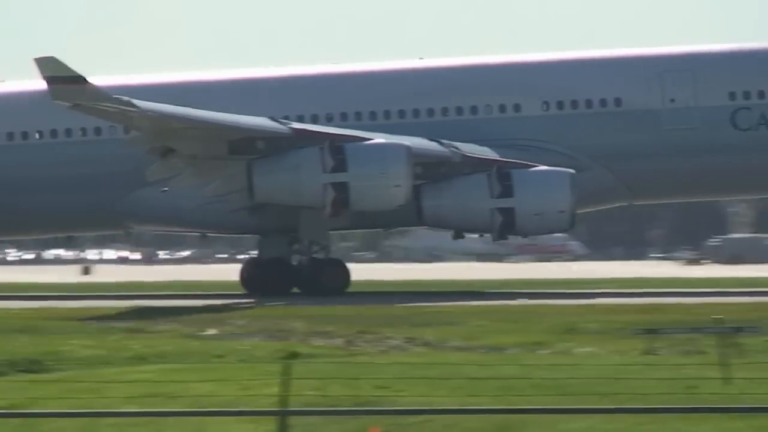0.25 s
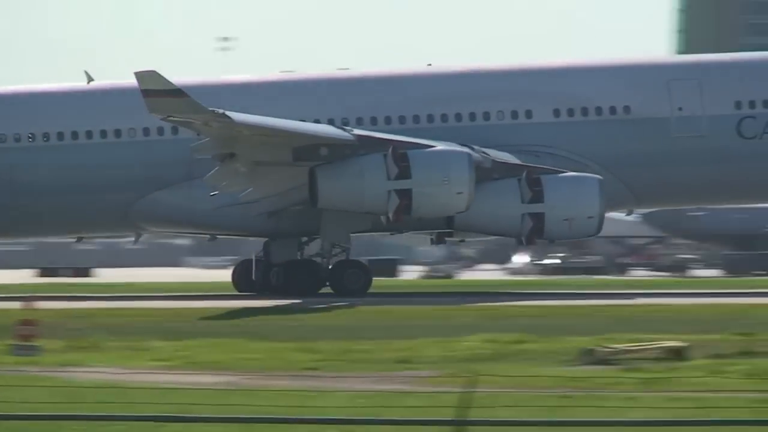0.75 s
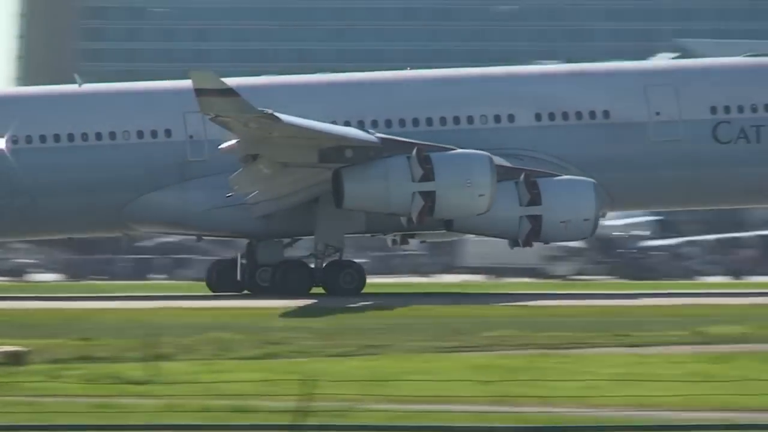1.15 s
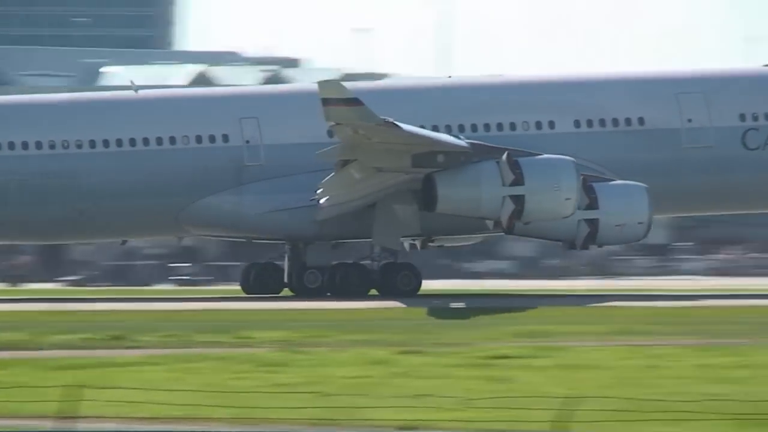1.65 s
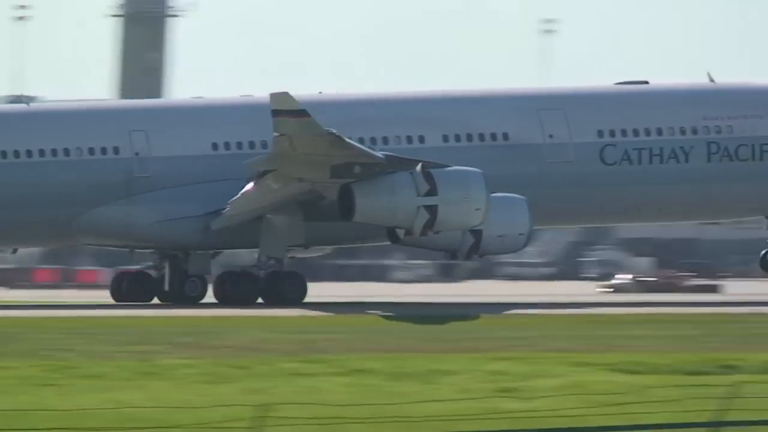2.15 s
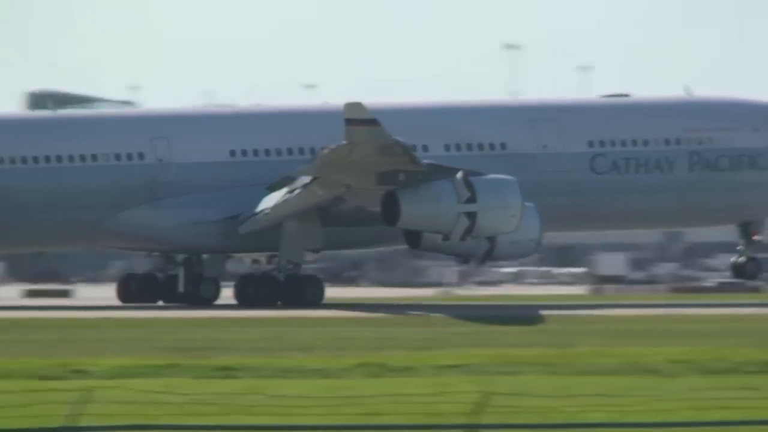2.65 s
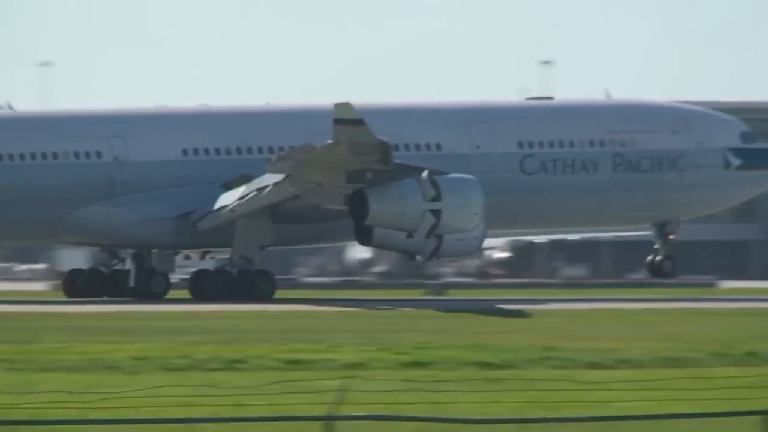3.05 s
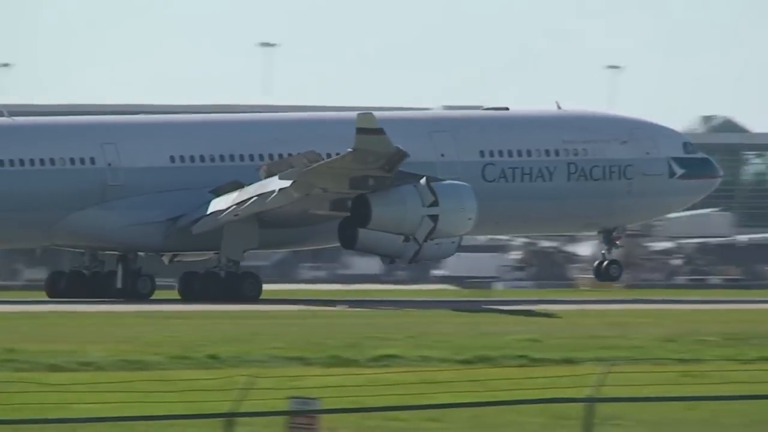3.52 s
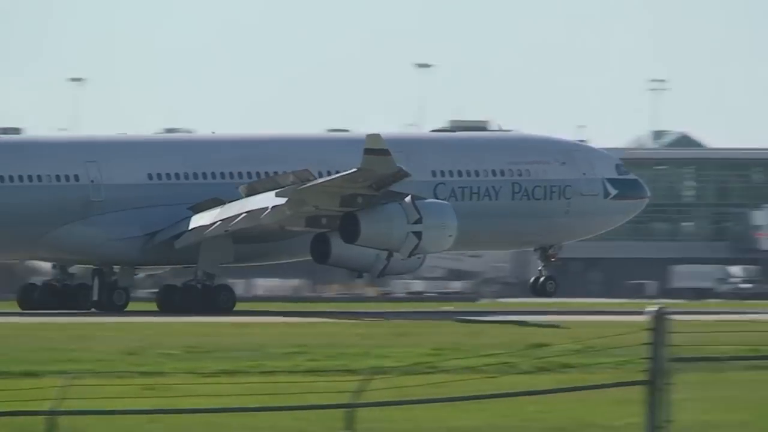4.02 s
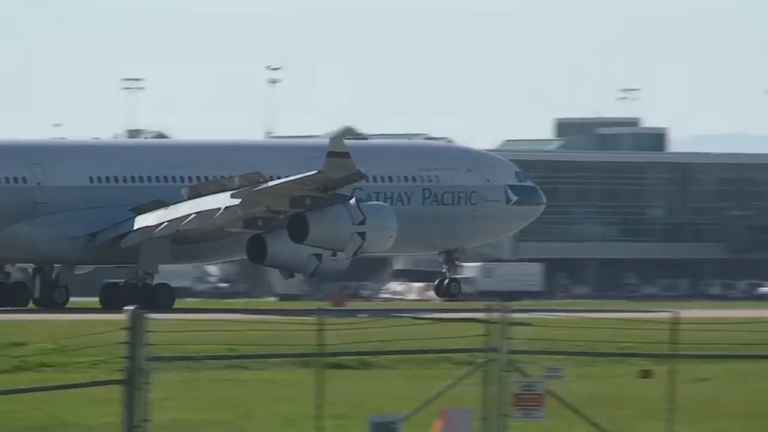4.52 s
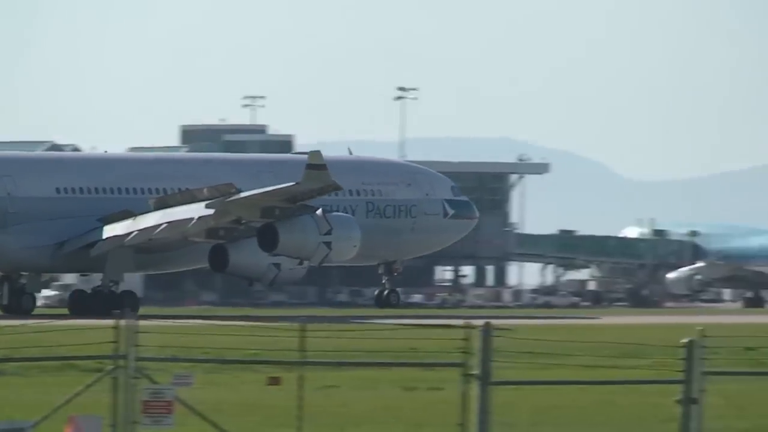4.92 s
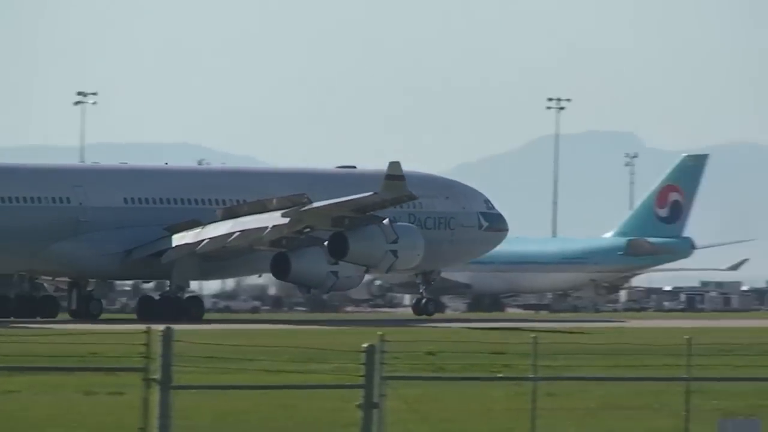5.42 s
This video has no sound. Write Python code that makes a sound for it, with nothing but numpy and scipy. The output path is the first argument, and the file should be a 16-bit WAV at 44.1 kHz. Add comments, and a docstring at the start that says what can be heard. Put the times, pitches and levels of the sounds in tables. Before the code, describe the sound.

Across an open airfield, the churning roar of a passing airliner's reversed jets runs throughout, rising and falling in uneven waves. It surges early, drops back briefly, then grows loud again and eases a little near the end, its pitch slowly sliding down. Beneath it are a soft exhaust rumble and light wind on the microphone, which ticks faintly on some peaks.

```python
"""A jet roar swells and fades: a four-engine airliner rolls past, heard across a field.
It is braking on the runway with reverse thrust, and its deflected jets churn the air.
Their tone sinks as the aircraft passes, and wind over the grass makes the loudness come and go.
Underneath lie a low exhaust rumble and a light breeze. The small microphone adds faint ticks."""
import sys
import numpy as np
from scipy import signal
from scipy.fft import rfft, irfft
from scipy.io import wavfile
from scipy.ndimage import uniform_filter1d, minimum_filter1d

SR = 44100
rng = np.random.default_rng(int(sys.argv[2]) if len(sys.argv) > 2 else 0)


def waveform_to_disk(signal):
    """Save audio, clipped to [-1, 1], as 16-bit WAV at the path in sys.argv[1]."""
    frames = np.transpose(np.atleast_2d(signal))
    scaled = np.clip(frames, -1, 1) * 32767
    samples = np.round(scaled).astype(np.int16)
    wavfile.write(sys.argv[1], SR, samples)


N = 250443
FRAME_HZ = np.fft.rfftfreq(1024, 1 / SR)  # the pitches in one short slice (frame) of sound
CLOSEST_S, SPEED_M_PER_S, DISTANCE_M = 1.95, 63.3, 248  # when, how fast and how far off it passes


def gain_of(db):
    """Turns decibels into a number to multiply the sound by."""
    return 10 ** (np.asarray(db) / 20)


def evened(x):
    """Scales a signal to an average strength (rms) of 1."""
    return x / np.sqrt(np.mean(x ** 2) + 1e-20)


def spectrum_db(points, hz):
    """The level at each pitch, joining a table's points with straight lines over the octaves."""
    pitch_hz, level_db = np.transpose(points)
    return np.interp(np.log(hz + 1), np.log(pitch_hz + 1), level_db)


def follow(rows, t):
    """The value of each table column at the times t."""
    time_s, *columns = np.transpose(rows)
    return [np.interp(t, time_s, column) for column in columns]


def bell(x, centre, width):
    """A smooth hump of height 1."""
    return np.exp(-.5 * ((x - centre) / width) ** 2)


def ramp(hz, zero_hz, full_hz):
    """Goes from 0 at one pitch to 1 at another."""
    return np.clip(np.log((hz + 1) / zero_hz) / np.log(full_hz / zero_hz), 0, 1)


def to_frames(x, size=1024):
    """Cuts a sound into short frames; returns their times and their spectra."""
    _, t, spectra = signal.stft(x, SR, nperseg=size, noverlap=size - size // 4)
    return t[:, None], spectra.T


def to_sound(spectra, size=1024):
    """Joins the frames back into a sound."""
    return signal.istft(spectra.T, SR, nperseg=size, noverlap=size - size // 4)[1][:N]


# How the roar swells and fades on arrival. Columns: time_s, level_db
ROAR_LOUDNESS = [(0, -30.5), (.31, -23), (.58, -28), (.74, -19), (.91, -19), (1.21, -26), (1.53, -28.5),
                 (1.93, -22.5), (2.39, -18.5), (2.59, -21.5), (3.18, -20.5), (3.42, -22.5), (3.57, -21.5),
                 (3.75, -23), (4.04, -19), (4.42, -18.5), (4.75, -20), (5.07, -23.5), (5.44, -22.8),
                 (5.68, -25)]


def roar(level_db=-0.15, twinkle_db=0.5, flutter_db=0.52):
    """The reversed jets: churning air, coloured by the engines, their motion and the field."""
    t, spectra = to_frames(turbulence(shocks_per_s=600, shock_share=0.2))
    # swirls of air on the way make the sound twinkle in patches and flutter as a whole
    twinkle = twinkle_db * eddies(spectra.shape, size=(10, 16))
    flutter = flutter_db * eddies((len(t), 1), size=(9, 1))
    colour = gain_of(engine_db(t) + wind_db(t) + ground_db(t) + twinkle)
    colour /= np.sqrt(np.mean(colour ** 2, axis=1, keepdims=True))  # same power in every frame
    loud_db = follow(ROAR_LOUDNESS, t)[0] + flutter + level_db
    return to_sound(spectra * colour * gain_of(loud_db))


def turbulence(shocks_per_s, shock_share):
    """Exhaust mixing with the air: a rushing noise with weak shocks scattered through it."""
    shocks = rng.standard_normal(N) * (rng.random(N) < shocks_per_s / SR)
    return evened(rng.standard_normal(N) + shock_share * evened(shocks))


def eddies(shape, size):
    """Swirls of air as smooth random patches; size is (frames, pitch steps) across."""
    patches = rng.standard_normal(shape)
    for axis, length in enumerate(size):
        for _ in range(2):
            patches = uniform_filter1d(patches, length, axis, mode="wrap")
    return evened(patches)


def bearing(t):
    """Angle to the aircraft in radians: negative as it comes, zero when it is closest."""
    return np.arctan(SPEED_M_PER_S * (t - CLOSEST_S) / DISTANCE_M)


# The roar's overall tone, from bass to treble. Columns: pitch_hz, level_db
JET_SPECTRUM = [(60, -59.5), (200, -25), (330, -14.5), (550, -8.5), (850, -1), (1200, 4), (1900, -2),
                (3200, -3.5), (4200, -6), (5400, -15), (6800, -26.5), (8300, -41.5), (10000, -56.5),
                (13000, -67.5)]
# Bumps and dips in that tone, before motion shifts and scales them. Columns: pitch_hz, width_hz, gain_db
ENGINE_HUMPS = [(520, 70, 2.5), (1653, 130, -2), (1980, 170, 2), (2416, 108, -4.5), (2920, 220, 3),
                (4620, 150, -2.5), (5260, 270, 0.94)]
# Directions in which the engines beam extra sound.
# Columns: bearing_deg, spread_deg, pitch_hz, width_octaves, gain_db
ENGINE_BEAMS = [(-10.5, 3, 3740, 0.1, 3), (4.5, 3.3, 2300, 0.42, 4.3), (8.5, 27, 7000, .66, 7)]


def engine_db(t, hump_floor=.15, hump_boost=1.27, hump_spread_deg=22, rear_treble_db=-11.0):
    """The engines' tone slides down (Doppler shift), is clearest side-on and dulls from behind."""
    angle, hz = bearing(t), FRAME_HZ
    degrees = np.degrees(angle)
    doppler = 1 / (1 + SPEED_M_PER_S / 343 * np.sin(angle))  # sound travels at 343 m/s
    clarity = hump_floor + hump_boost * bell(degrees, 0, hump_spread_deg)
    humps = sum(db * bell(hz / doppler, pitch, width) for pitch, width, db in ENGINE_HUMPS)
    beams = sum(db * bell(degrees, aim, spread) * bell(np.log2((hz + 1) / pitch), 0, octaves)
                for aim, spread, pitch, octaves, db in ENGINE_BEAMS)
    facing = beams + rear_treble_db * np.sin(angle) * ramp(hz, 3000, 8000)
    return spectrum_db(JET_SPECTRUM, hz) + clarity * humps + facing - facing.mean(0)


# How far the middle pitches stand out from the rest of the roar. Columns: time_s, gain_db
MIDDLE_SWELL = [(0, 6), (.38, -0.3), (.58, -4), (.75, -0.5), (1.18, -2), (1.74, 2), (2.03, 0.2),
                (3.08, 2.5), (3.32, -1), (4.5, 0.5), (5.1, -0.6), (5.4, 2), (5.68, -1.7)]


def wind_db(t, body_steadiness=0.64, hiss_steadiness=0.2, mid_hz=1100, mid_octaves=0.83):
    """Wind swells the middle pitches most; the low body and the fine hiss stay steadier."""
    swell_db = follow(ROAR_LOUDNESS, t)[0]
    middle_db = follow(MIDDLE_SWELL, t)[0] * bell(np.log2((FRAME_HZ + 1) / mid_hz), 0, mid_octaves)
    body = body_steadiness * ramp(FRAME_HZ, 1000, 520)
    hiss = hiss_steadiness * ramp(FRAME_HZ, 3000, 8000)
    return middle_db - (body + hiss) * (swell_db - swell_db.mean())


# Where sound bouncing off the field cancels the direct sound. Columns: time_s, pitch_hz, gain_db
GROUND_DIP = [(.72, 245, 0), (.88, 315, -6.5), (1.13, 700, -5), (1.3, 870, -3.5), (1.48, 1400, 1),
              (1.74, 1860, -3), (3.7, 200, -2), (4.58, 195, -6.5), (5.68, 210, -10.5)]


def ground_db(t, width_octaves=0.93):
    """The bounce off the ground carves a dip in the tone that wanders with wind and angle."""
    dip_hz, dip_db = follow(GROUND_DIP, t)
    return dip_db * bell(np.log2((FRAME_HZ + 1) / dip_hz), 0, width_octaves)


# The tone of the exhaust's low rumble. Columns: pitch_hz, relative_level_db
RUMBLE_SPECTRUM = [(15, -24), (40, -17.5), (75, -4), (115, -1.5), (190, 1), (300, -2), (600, -24),
                   (2000, -70.5)]


def rumble(level_db=-35, loudest_deg=6, spread_deg=17, end_on_db=-5):
    """Big, slow swirls of exhaust, loudest with the engines about side-on."""
    t, spectra = to_frames(rng.standard_normal(N))
    side_on = bell(np.degrees(bearing(t)), loudest_deg, spread_deg)
    loud_db = level_db + end_on_db * (1 - side_on)
    tone_db = spectrum_db(RUMBLE_SPECTRUM, FRAME_HZ) + ground_db(t)
    return to_sound(spectra * gain_of(loud_db + tone_db))


# The tone of a light breeze at the microphone. Columns: pitch_hz, relative_level_db
BREEZE_SPECTRUM = [(15, -7), (40, -9), (80, 2), (120, -3), (250, -21.5), (1000, -57)]


def breeze(level_db=-43):
    """Moving air makes a faint, steady rumble under everything."""
    _, spectra = to_frames(rng.standard_normal(N))
    return to_sound(spectra * gain_of(level_db + spectrum_db(BREEZE_SPECTRUM, FRAME_HZ)))


# When the overloaded microphone ticks. Columns: start_s, relative_level_db
OVERLOAD_TICKS = [(0.825, -51), (2.2603, -54), (3.5932, -52), (4.0128, -54), (4.0916, -56), (4.2258, -52),
                  (4.3221, -40), (4.3864, -50), (4.4243, -59), (4.5146, -59)]


def ticks(boost_db=11):
    """Faint sharp ticks as the microphone overloads on the roar's peaks; each is a single click."""
    start_s, level_db = np.transpose(OVERLOAD_TICKS)
    start_samples = np.round(start_s * SR).astype(int)
    return np.bincount(start_samples, weights=gain_of(level_db + boost_db), minlength=N)


def scene():
    """Roar, rumble, breeze and ticks, in one channel."""
    return (roar() + rumble() + breeze() + ticks())[None]


def housing(x, spacing_hz=1680, ripple_db=0.9, cavity_hz=1185, cavity_width_hz=60, cavity_db=-0.23):
    """The microphone's case: a short echo ripples the treble, and a cavity makes a tiny dip."""
    hz = np.fft.rfftfreq(N, 1 / SR)
    echo_db = ripple_db * ramp(hz, 2000, 4700) * np.cos(2 * np.pi * hz / spacing_hz)
    dip_db = cavity_db * bell(hz, cavity_hz, cavity_width_hz)
    return irfft(rfft(x) * gain_of(echo_db + dip_db), N)


def limiter(x, ceiling=.36, hold_samples=64, clipped_share=.1):
    """Turns the highest peaks down for a moment; a little of each is clipped and ticks faintly."""
    needed_gain = ceiling / np.maximum(abs(x), ceiling)
    gain = uniform_filter1d(minimum_filter1d(needed_gain, hold_samples), hold_samples)
    return (1 - clipped_share) * gain * x + clipped_share * np.clip(x, -ceiling, ceiling)


def record(dry, hiss_db=-71.5, cutoff_hz=15800):
    """The microphone colours the sound, tames peaks, adds its own hiss and loses the top treble."""
    picked_up = limiter(housing(dry[0])) + gain_of(hiss_db) * rng.standard_normal(N)
    low_pass = signal.firwin(1023, cutoff_hz, window=("kaiser", 9), fs=SR)
    return signal.oaconvolve(picked_up, low_pass, "same")[None]


dry = scene()
out = record(dry)
waveform_to_disk(out)
```